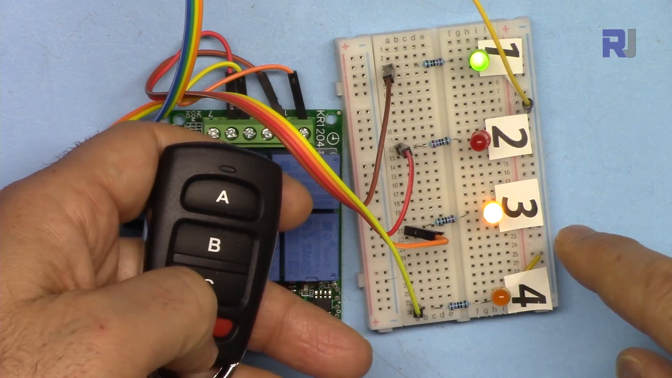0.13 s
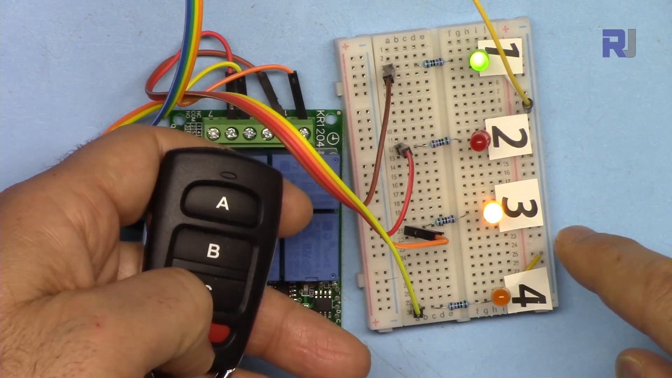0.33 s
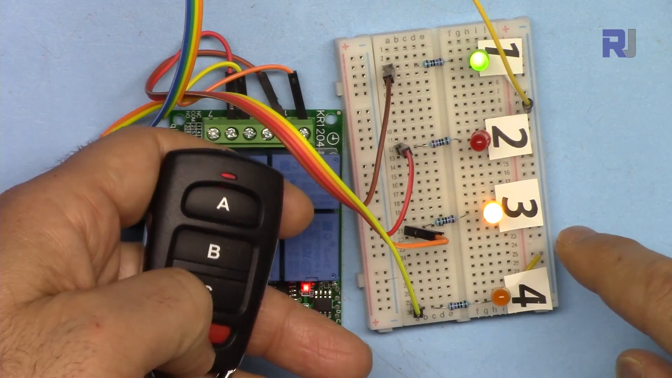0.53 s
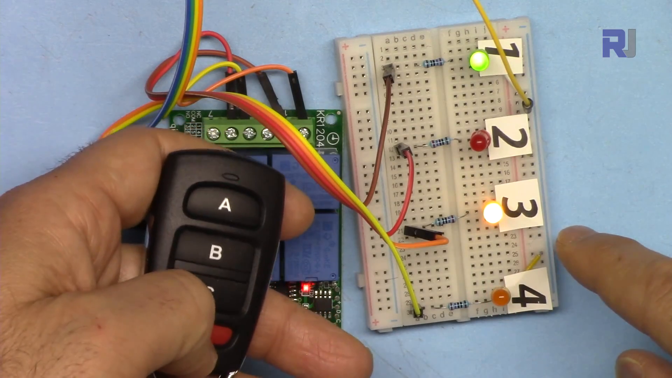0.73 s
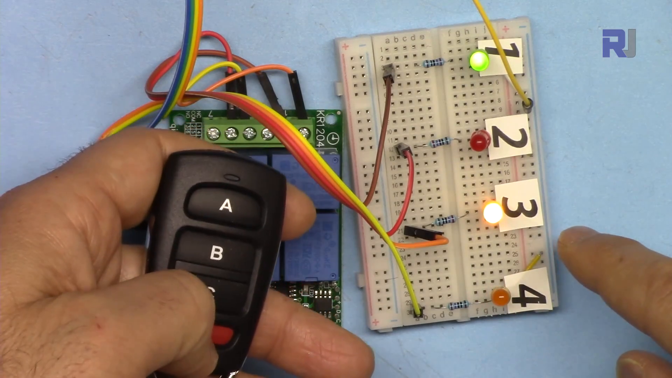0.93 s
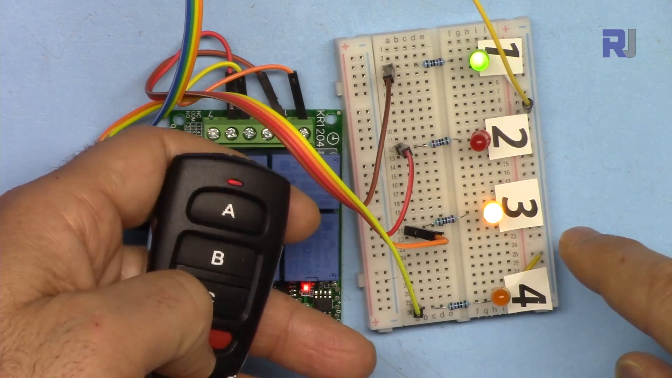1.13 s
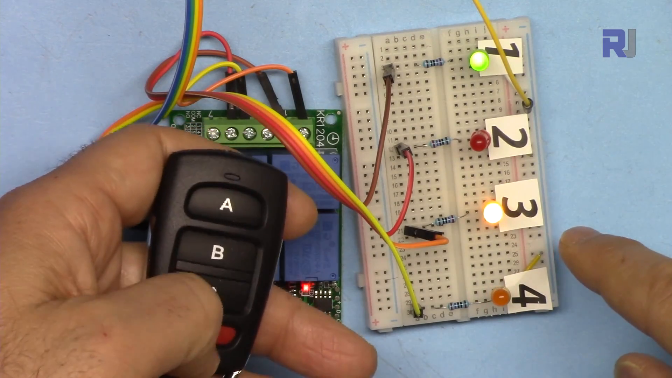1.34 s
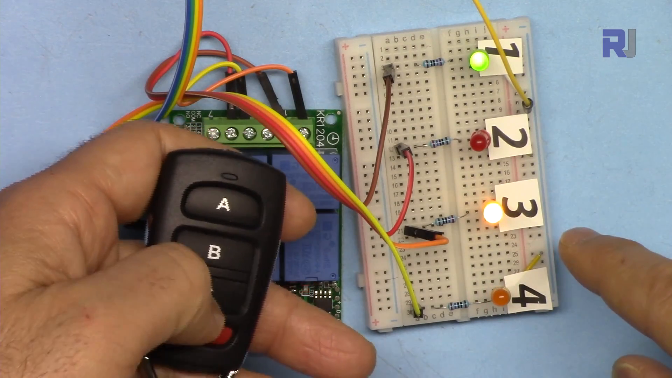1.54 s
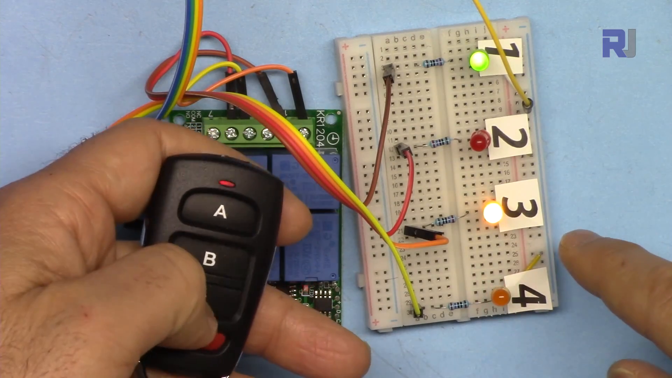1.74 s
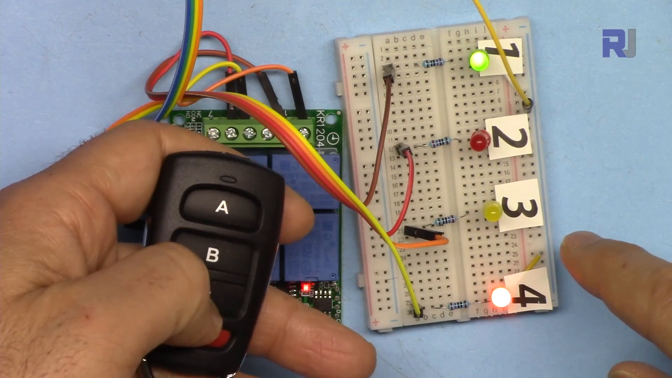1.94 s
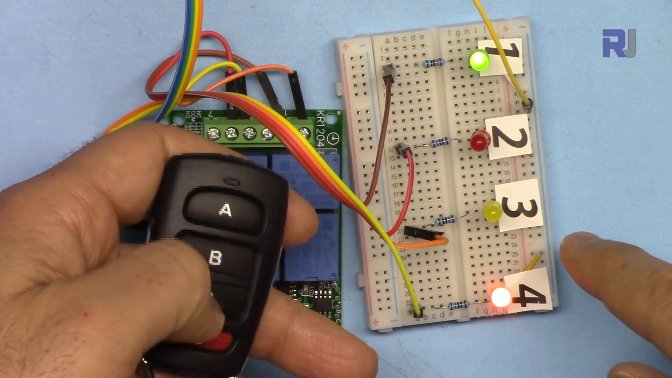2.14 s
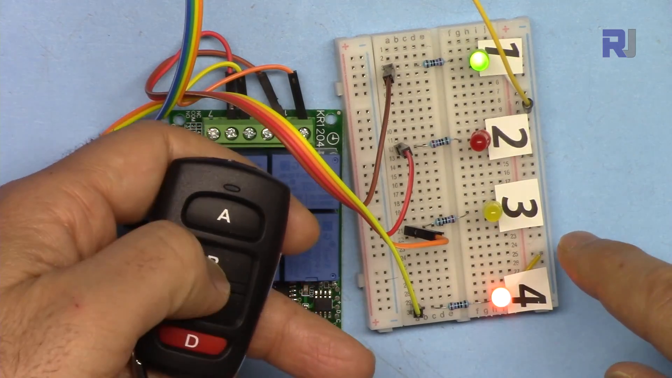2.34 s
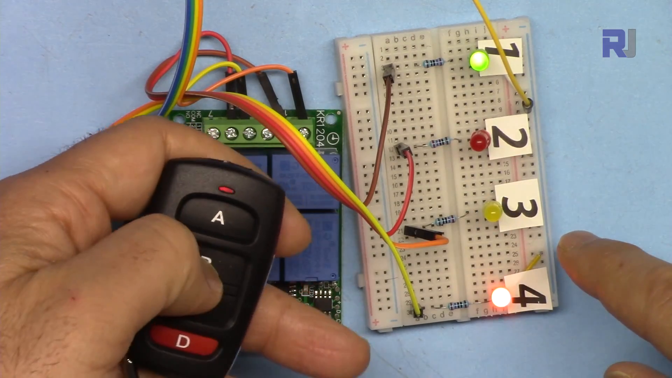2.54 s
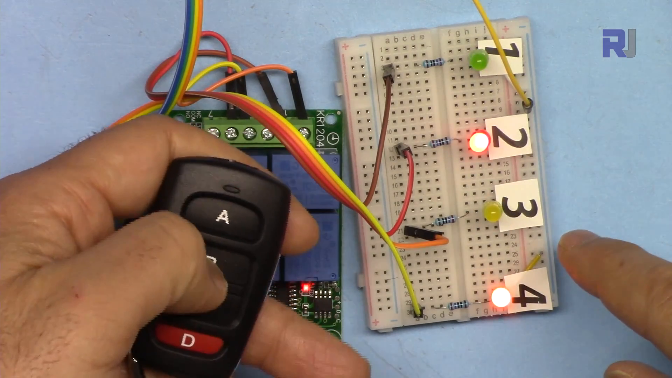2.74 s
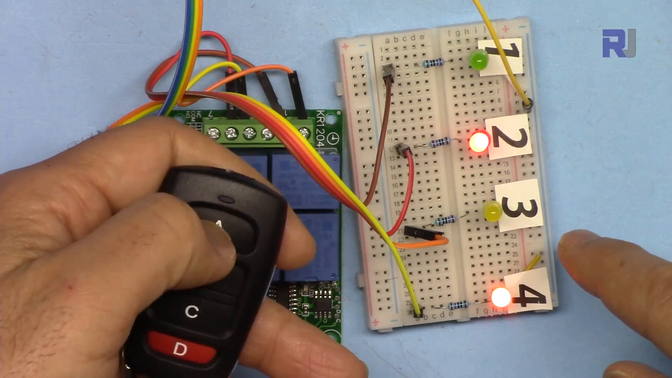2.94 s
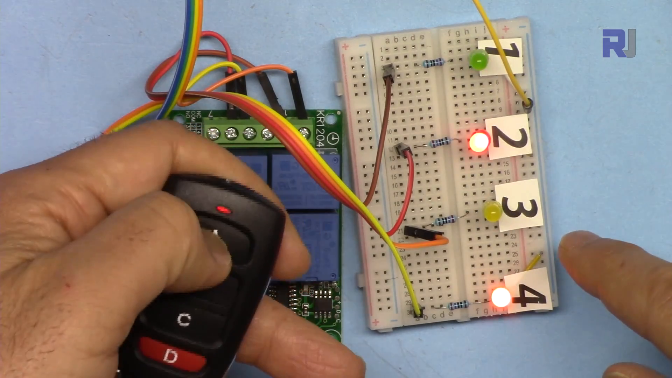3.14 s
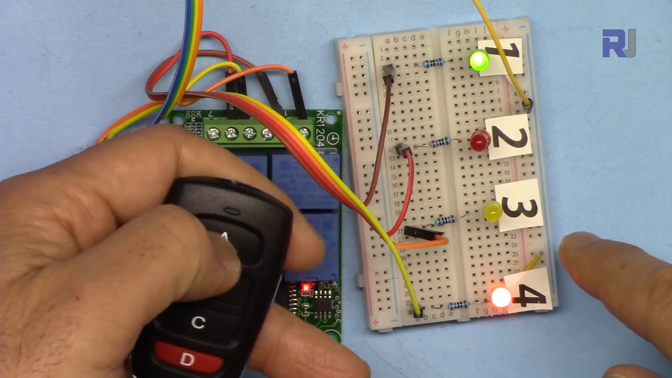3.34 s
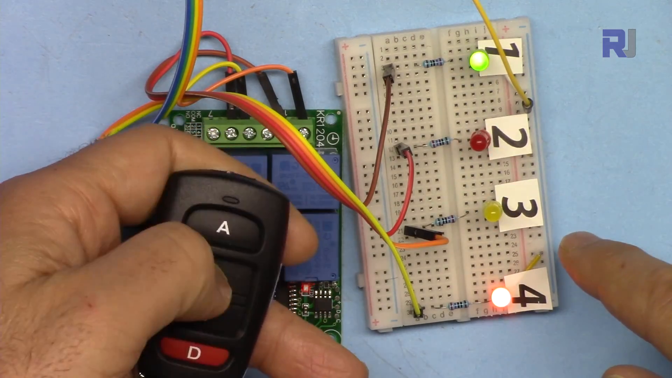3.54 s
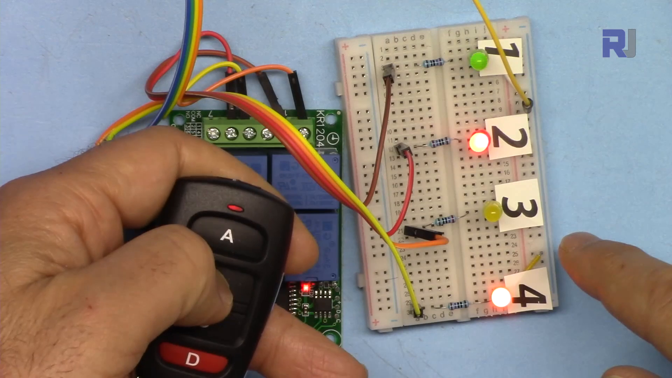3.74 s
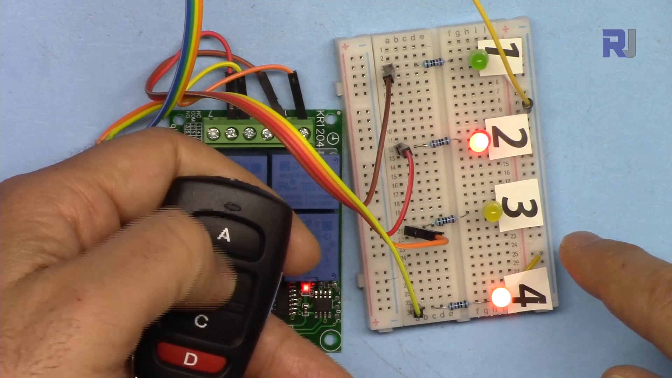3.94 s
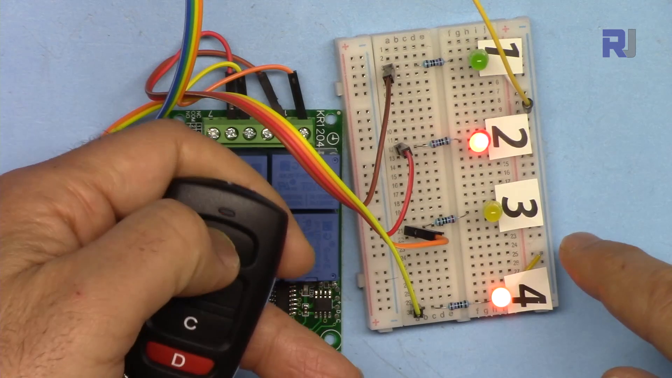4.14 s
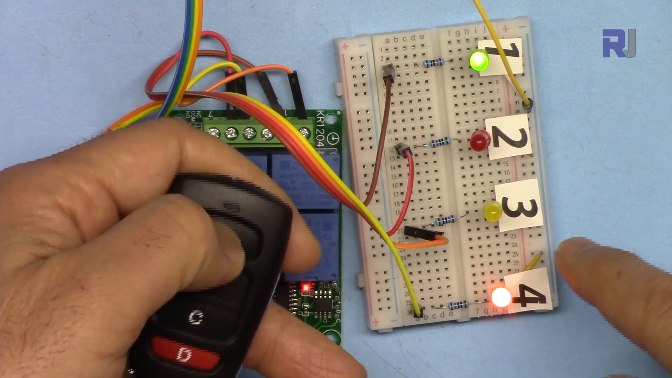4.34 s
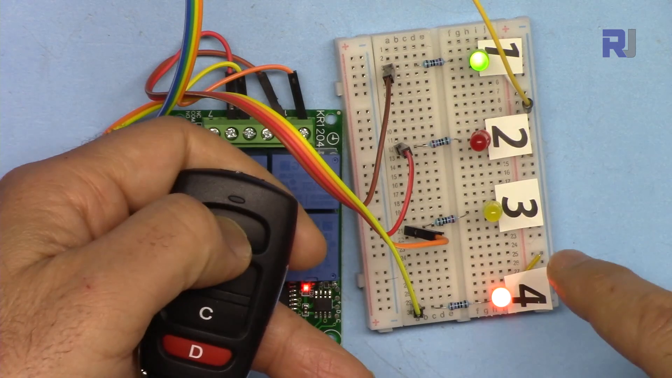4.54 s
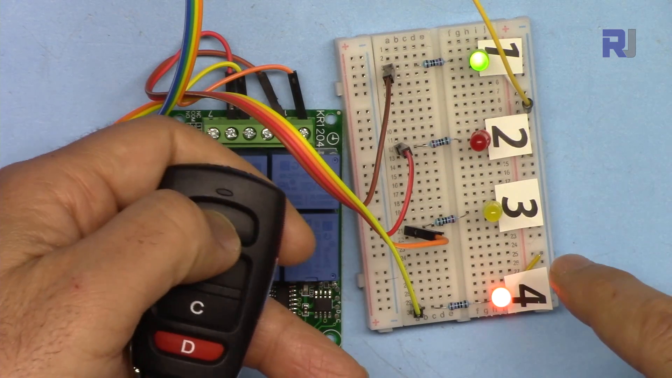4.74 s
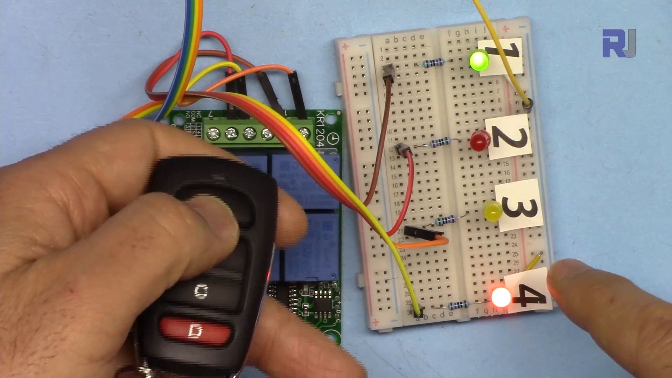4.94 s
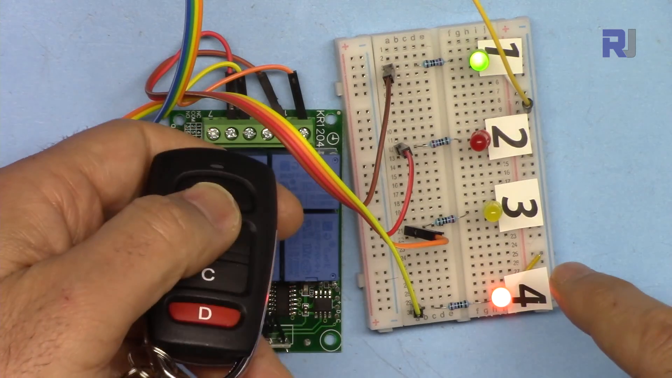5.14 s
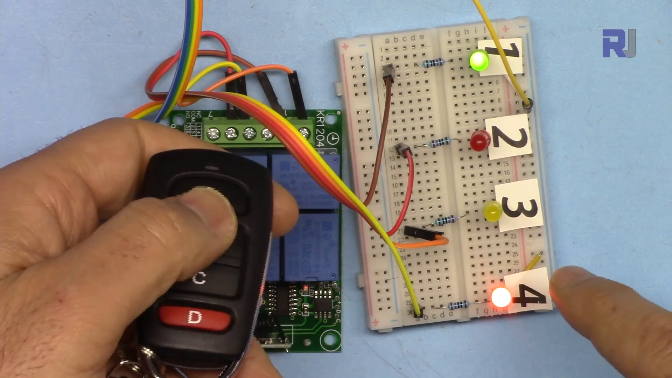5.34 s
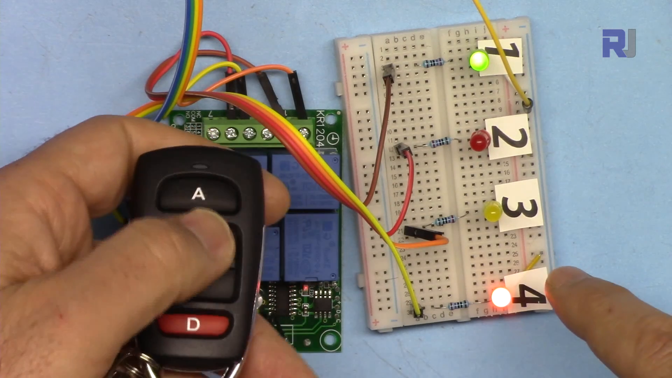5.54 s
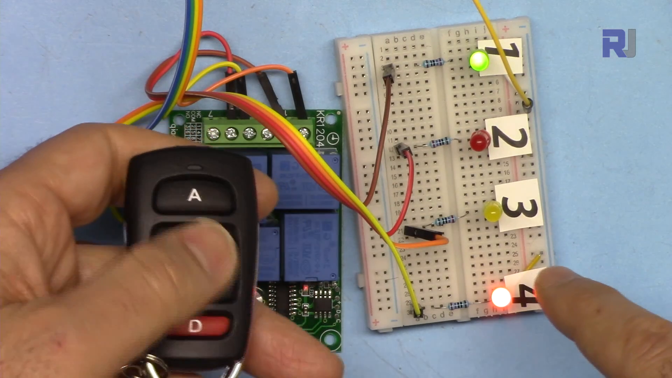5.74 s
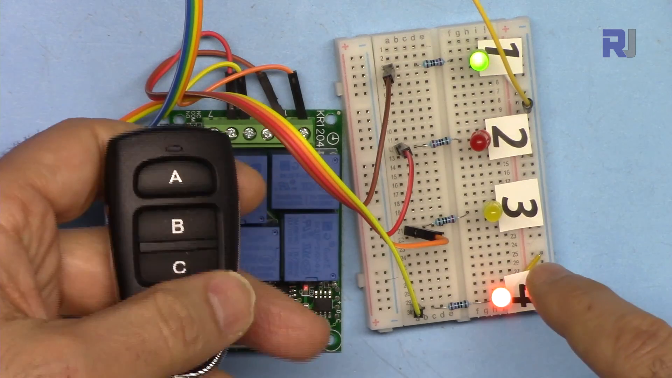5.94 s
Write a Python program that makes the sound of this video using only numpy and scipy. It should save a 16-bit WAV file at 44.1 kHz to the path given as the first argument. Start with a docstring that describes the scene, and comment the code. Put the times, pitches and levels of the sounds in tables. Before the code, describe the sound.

A workbench heard closely by a near-centred stereo microphone, with short dry room reflections. Paired plastic clicks with metallic dome ring repeat seven times. From the third press, a louder, brighter relay clack lands just after each downward click. After the last one only small case ticks and faint creaky finger slips remain, with quiet hum, soft hiss and a low rumble that swells occasionally.

```python
"""A plastic key-fob remote over a workbench in a small room, heard by a two-channel microphone.
Mains and fan tones, a swelling low rumble and faint hiss run throughout.
A thumb snaps each button down and back up: metal domes ring and knock the case.
The case ticks in the hand as the grip shifts; from the third press on, each press is answered by a
relay board's sharp, bouncing clack. Later, skin rubs and creaks on the case in tiny uneven slips."""
import sys
import numpy as np
from scipy import signal
from scipy.fft import rfft, irfft
from scipy.io import wavfile

SR = 44100
rng = np.random.default_rng(int(sys.argv[2]) if len(sys.argv) > 2 else 0)


def materialize(psi):
    """Save the field psi as 16-bit PCM at rate SR to the path in sys.argv[1].

    A 1-D psi becomes a single channel; in a 2-D psi each row is a channel.
    """
    bounded = np.clip(np.atleast_2d(psi).T, -1, 1)
    quanta = np.round(bounded * 32767).astype(np.int16)
    wavfile.write(sys.argv[1], SR, quanta)


N = 268877  # samples


def from_db(db):
    """Decibels to amplitude gain."""
    return 10 ** (np.asarray(db) / 20)


def rms_one(x):
    """Scale to unit rms."""
    return x / np.sqrt(np.mean(x ** 2) + 1e-20)


def colour(x, spectrum):
    """Shape a signal's spectrum by (Hz, dB) points, joined along log frequency."""
    hz, db = np.transpose(spectrum)
    bins = np.maximum(np.fft.rfftfreq(len(x), 1 / SR), 1)
    gain = from_db(np.interp(np.log(bins), np.log(hz), db))
    return irfft(rfft(x) * gain, len(x))


def resonate(x, modes, tilt_db=0, pivot_hz=1000):
    """Parallel resonances of alternating sign, tilted in dB per octave about a pivot."""
    out = 0
    for k, (hz, width_hz, db) in enumerate(modes):
        radius = np.exp(-np.pi * width_hz / SR)  # a wider resonance dies sooner
        level = from_db(db + tilt_db * np.log2(hz / pivot_hz))
        gain = (-1) ** k * level * (1 - radius * radius) / 2
        poles = [1, -2 * radius * np.cos(2 * np.pi * hz / SR), radius * radius]
        out = out + signal.lfilter([gain, 0, -gain], poles, x + 1e-18)
    return out


def add(out, start_s, sound):
    """Mix a short sound in at a time."""
    at = round(start_s * SR)
    out[at:at + len(sound)] += sound[:N - at]


def wander(per_s):
    """A slow random curve: straight lines between normal draws of unit spread."""
    knots = rng.standard_normal(200)
    return np.interp(np.arange(N) / SR * per_s, np.arange(len(knots)), knots)


def background(waver_rad=0.17, wavers_per_s=4.2, air_db=-61.5, rumble_db=-62.5, swell_s=0.21):
    """Mains and fan sines waver in phase over steady air noise and a resonant, swelling low rumble."""
    # mains and fan tones: pitch_hz, rms level_db
    tones = [(60, -64.5), (120, -70), (152, -68), (220.7, -74.5), (240, -75.5), (360, -74), (399.3, -73),
             (608, -90.5), (759, -84.5), (974.4, -77.5)]
    # steady air noise, relative spectrum: frequency_hz, density_db
    air = [(20, -6.5), (55, -9.5), (80, -15.5), (130, -17), (220, -16.5), (300, -18.5), (400, -17.5),
           (550, -22.5), (1000, -21), (1400, -27), (2000, -34), (4000, -39.5), (8000, -42), (16000, -45.5)]
    # the room's low boom: pitch_hz, width_hz, level_db
    boom = [(35.3, 5.2, 0)]
    # the boom swells now and then: peak_s, rise_db
    swells = [(1.609, 7), (2.98, 6.5), (5.359, 5), (6.0, 3.5)]
    t = np.arange(N) / SR
    out = from_db(air_db) * rms_one(colour(rng.standard_normal(N), air))
    swell_db = sum(db * np.exp(-((t - peak_s) / swell_s) ** 2) for peak_s, db in swells)
    rumble = resonate(rng.standard_normal(N + SR), boom)[SR:]  # the first second settles unheard
    out += from_db(rumble_db + swell_db) * rms_one(rumble)
    for hz, db in tones:
        phase = rng.uniform(0, 2 * np.pi) + waver_rad * wander(wavers_per_s)
        out += np.sqrt(2) * from_db(db) * np.sin(2 * np.pi * hz * t + phase)
    return out


def room(x, gap_s=0.0011, build_s=0.004, split_hz=2500, t60_s=0.16, low_t60_s=0.22):
    """Dense reflections from the bench and walls; the lows last a little longer."""
    # strength of the room's tail: frequency_hz, level_db
    tail_spectrum = [(200, 1.5), (800, -11), (1400, -11), (3000, -5), (4500, -8.5), (5300, -15.5),
                     (6200, -13.5), (7500, -16.5), (9200, -10), (12000, -11), (16000, -16)]
    t = np.arange(SR // 2) / SR
    noise = colour(rng.standard_normal(len(t)), tail_spectrum)
    low = signal.sosfiltfilt(signal.butter(2, split_hz, fs=SR, output="sos"), noise)
    onset = np.clip((t - gap_s) / build_s, 0, 1)
    tail = 0
    for band, decay_s in ((low, low_t60_s), (noise - low, t60_s)):
        fade = onset * np.exp(-np.log(1000) * t / decay_s)  # 60 dB down after decay_s
        tail = tail + band * fade / np.linalg.norm(fade)
    return signal.fftconvolve(x, tail)[:N]


def tick(favoured_hz, scuff_s=0.0013, focus_db=10, focus_octaves=.3):
    """A millisecond scuff on the case; where it lands decides which modes ring most."""
    # what the ticks ring with: pitch_hz, width_hz, level_db
    fob_modes = [(4724, 560, 3), (6690, 730, 1), (7190, 680, 3.5), (8430, 800, -0.5), (10240, 3100, -6.5),
                 (14220, 1400, -4)]
    t = np.arange(SR // 50) / SR
    scuff = rng.standard_normal(len(t)) * np.exp(-t / scuff_s)
    modes = []
    for hz, width_hz, db in fob_modes:
        octaves_off = np.log2(hz / favoured_hz)
        # modes far from the favoured pitch lose up to focus_db
        loss_db = focus_db * (1 - np.exp(-(octaves_off / focus_octaves) ** 2))
        modes.append((hz, width_hz, db - loss_db))
    return resonate(scuff / np.linalg.norm(scuff), modes)


def handling(slips_per_s=2500, spread_db=5.0, faint_per_s=2.2, faint_db=-33, faint_spread_db=3, faint_hz=6140):
    """The case ticks under the grip, faintly at random too, and skin slips over it in tiny uneven steps."""
    # the clearer ticks of the fob in the hand: start_s, level_db, favoured pitch_hz
    clear_ticks = [(.561, -23, 6700), (.922, -29.5, 6900), (1.242, -26, 7000), (1.545, -18.5, 6400),
                   (2.79, -28, 6000), (2.9232, -11.5, 7240), (3.39, -22, 5670), (3.405, -23, 5800),
                   (3.942, -17.5, 4940), (3.9548, -8, 5700), (4.046, -22.5, 6000), (4.114, -22.5, 6570),
                   (4.289, -22.5, 8200), (4.852, -25, 4400), (4.895, -15, 5100), (4.994, -17, 4400),
                   (5.492, -30, 4400), (5.801, -15.5, 6330)]
    # skin rubbing and creaking on the case: start_s, length_s, level_db, tilt_db_per_octave
    rubs = [(3.94, 0.026, -42.5, 8), (4.826, 0.13, -45.5, -3), (4.983, 0.033, -38, -7.5),
            (5.023, 0.077, -43, -4), (5.473, 0.045, -50, 7), (5.74, 0.056, -44, -0.5),
            (5.798, 0.098, -46, 4)]
    # what the rubs ring with: pitch_hz, width_hz, level_db
    rub_modes = [(3280, 840, -20), (4400, 330, -1.5), (7200, 1600, -12.5), (9650, 810, -8.5),
                 (14000, 1400, -21)]
    out = np.zeros(N)
    for start_s, db, hz in clear_ticks:
        add(out, start_s, from_db(db) * tick(hz))

    faint_levels = from_db(faint_db + faint_spread_db * rng.standard_normal(N))
    faint = (rng.random(N) < faint_per_s / SR) * faint_levels
    out += signal.fftconvolve(faint, tick(faint_hz))[:N]

    slip_sizes = from_db(spread_db * rng.standard_normal(N)) * rng.choice([-1, 1], N)
    slips = (rng.random(N) < slips_per_s / SR) * slip_sizes
    for start_s, length_s, db, tilt_db in rubs:
        stroke = slips[round(start_s * SR):round((start_s + length_s) * SR)]
        pressure = from_db(db) * signal.windows.tukey(len(stroke), .5)
        add(out, start_s, resonate(stroke * pressure, rub_modes, tilt_db, pivot_hz=4500))
    return out


def lesser_impacts(unevenness=.15, count=4, bounce_gap_s=.00047, bounce_loss_db=2.5):
    """Lift, first touch, dying bounces and a rebound: (s, dB) from the main impact, unevenly timed."""
    bounces = [(k * bounce_gap_s, -k * bounce_loss_db) for k in range(1, count + 1)]
    impacts = [
        (-.0023, -16.5),  # the armature leaves its stop
        (-.0005, -9),  # the contacts meet
        *bounces,  # the armature bounces, weaker each time
        (.0037, -9.5)]  # the contact spring swings back
    return [(s * (1 + unevenness * rng.uniform(-1, 1)), db) for s, db in impacts]


def relays(detune=0.045, rattle_db=-25.5, rattle_s=0.0023, spring_width_hz=170,
           board_rattle_db=-28, board_rattle_s=0.024):
    """Armature and contacts land in a quick cluster of impacts that ring frame and spring and thump the board."""
    # clacks: start_s, level_db, tilt_db_per_octave, board thump_db, spring_hz, spring_db
    clacks = [(1.7674, -1.7, -0.4, -6, 8770, -15), (2.5722, -0.5, 0.4, 0, 7800, 0.5),
              (3.1722, -2, 2.5, -2.5, 8500, 7), (3.729, -2, 2.3, 0.5, 6620, 0),
              (4.2027, -2.5, 0.1, -2.5, 10800, 11.5)]
    # relay frame and cover: pitch_hz, width_hz, level_db
    frame_modes = [(2283, 170, -20.5), (3433, 410, -14), (3520, 1200, -15), (4520, 370, -13),
                   (4984, 490, -3.5), (6210, 590, 2.5), (7050, 470, 10.5), (8030, 880, 10),
                   (8780, 1100, -1.5), (9430, 310, -1.6), (10880, 310, 3), (12850, 770, -0.5),
                   (15190, 1200, -6)]
    # the circuit board under the relays: pitch_hz, width_hz, level_db
    board_modes = [(200, 40, -15), (322, 90, -9), (480, 80, -10), (700, 250, -5.5), (890, 31, -5.5),
                   (1121, 420, -30.5), (1426, 210, -22.5)]
    out, t = np.zeros(N), np.arange(SR // 12) / SR
    snap = signal.unit_impulse(len(t))
    for start_s, db, tilt_db, thump_db, spring_hz, spring_db in clacks:
        # the parts go on rattling finely for a few milliseconds
        rattle = from_db(rattle_db) * rng.standard_normal(len(t)) * np.exp(-t / rattle_s)
        add(out, start_s, from_db(db) * resonate(snap + rattle, frame_modes, tilt_db, pivot_hz=7500))
        add(out, start_s, resonate(snap, [(spring_hz, spring_width_hz, spring_db)]))
        # the loose board jiggles on the bench
        jiggle = from_db(board_rattle_db) * rng.standard_normal(len(t)) * np.exp(-t / board_rattle_s)
        add(out, start_s, from_db(thump_db) * resonate(snap + jiggle, board_modes))
        for offset_s, impact_db in lesser_impacts():
            # each lesser impact lands elsewhere and rings at slightly different pitches
            modes = [(hz * np.exp(detune * rng.standard_normal()), width_hz, level_db)
                     for hz, width_hz, level_db in frame_modes]
            impact = resonate(snap, modes, tilt_db, pivot_hz=7500)
            add(out, start_s + offset_s, from_db(db + impact_db) * impact)
    return out


def buttons():
    """A dome flips over, rings briefly and knocks the case; the release is a softer contact than the press."""
    # thumb presses: down_s, up_s, button, strength_db, hardness (factor on the contact cut-off)
    presses = [(0.3874, 0.5948, "C", 0, 0.99), (1.0603, 1.2584, "C", -0.6, 0.99),
               (1.6998, 1.8532, "B", -0.6, 1.1), (2.5044, 2.6953, "B", 0.5, 0.96),
               (3.103, 3.2962, "A", -0.5, .96), (3.6607, 3.8447, "B", -0.2, 1),
               (4.1347, 4.3293, "A", -0.4, 1.07)]
    # the plastic case as the thumb damps it at each button: pitch_hz, width_hz, level_db
    case_modes = {"A": [(725, 370, -8.5), (1039, 166, 5.5), (1238, 270, 3.5), (1494, 170, -3.5),
                  (1700, 130, -17), (2220, 650, -14)], "B": [(806, 390, -6.5), (882, 330, 0),
                  (1150, 430, 0), (1502, 130, 1), (1672, 130, -11), (2128, 520, -12)],
                  "C": [(804, 233, -4.5), (1004, 172, 0.5), (1252, 184, 3), (1488, 115, -2),
                  (1775, 75, -15), (2070, 680, -10.5)]}
    # the metal dome under each button: pitch_hz, width_hz, level_db
    dome_modes = { "A": [(3640, 1420, -12.5), (5300, 410, -7), (7400, 810, -4.5), (8700, 410, 2),
                  (10850, 1100, -3.5), (14400, 2300, -8)], "B": [(3897, 830, -11), (5600, 1100, -6.5),
                  (7120, 620, 2), (8640, 850, -2), (10930, 1000, -4.5), (13460, 1200, 0.5)],
                  "C": [(5170, 420, 2), (6850, 400, 0.5), (7800, 240, 1.5), (10380, 320, 2.5),
                  (11400, 1300, -4.5), (15700, 670, 14)]}
    # going down, a light, hard snap for each button: case_db, dome_db, contact cut-off_hz before hardness
    down_feel = {"A": (-1, -11, 18500), "B": (-1.5, -7, 10600), "C": (-3.5, -8.5, 14500)}
    # coming up, a heavier, softer one: case_db, dome_db, contact cut-off_hz before hardness
    up_feel = {"A": (3.65, -4, 6230), "B": (4.3, -4, 6340), "C": (2, -0.74, 8100)}
    out, snap = np.zeros(N), signal.unit_impulse(SR // 20)
    for down_s, up_s, key, db, hardness in presses:
        for start_s, feel in ((down_s, down_feel[key]), (up_s, up_feel[key])):
            case_db, dome_db, contact_hz = feel
            cutoff_hz = min(hardness * contact_hz, SR / 2 - 1000)
            contact = signal.lfilter(*signal.butter(3, cutoff_hz, fs=SR), snap)
            knock = from_db(db + case_db) * resonate(snap, case_modes[key])
            ring = from_db(db + dome_db) * resonate(contact, dome_modes[key])
            add(out, start_s, knock + ring)
    return out


def scene(pan_db=1.54, left_lag_s=2.02e-5):
    """Everything reaches one microphone, whose left channel is a little louder and later."""
    fob, board = buttons() + handling(), relays()
    right = fob + room(fob) + board + room(board) + background()
    # a phase slope delays the left by less than one sample
    lag = np.exp(-2j * np.pi * np.fft.rfftfreq(N, 1 / SR) * left_lag_s)
    left = irfft(rfft(right) * lag, N)
    return np.array([left * from_db(pan_db), right * from_db(-pan_db)])


def record(dry, cutoff_hz=16200):
    """A steep elliptic low-pass cuts the top."""
    return signal.sosfilt(signal.ellip(10, .1, 70, cutoff_hz, fs=SR, output="sos"), dry)


dry = scene()
out = record(dry)
materialize(out)
```